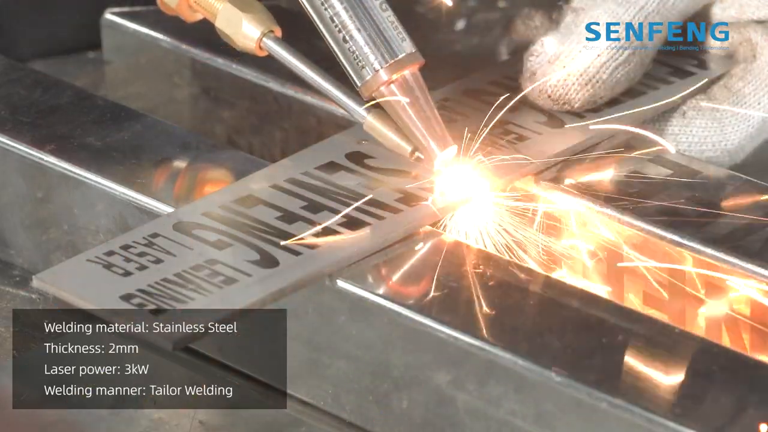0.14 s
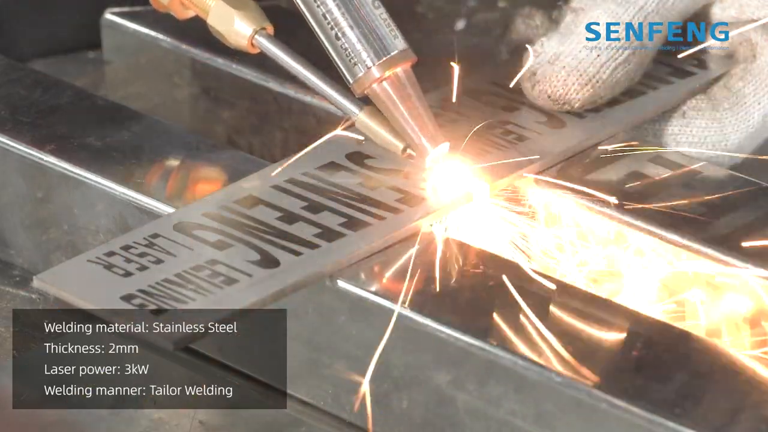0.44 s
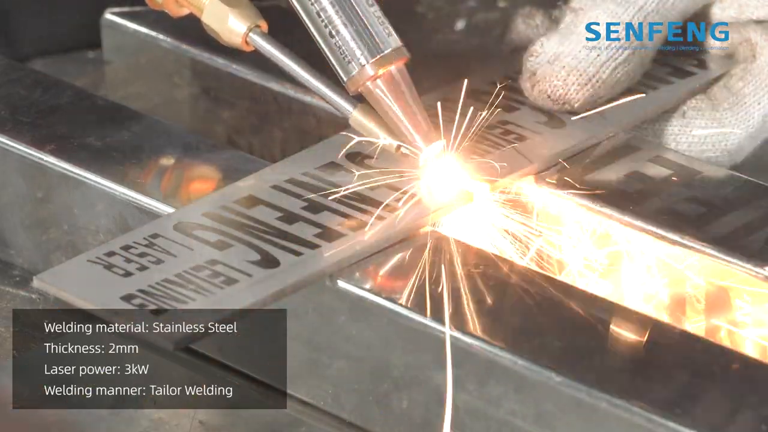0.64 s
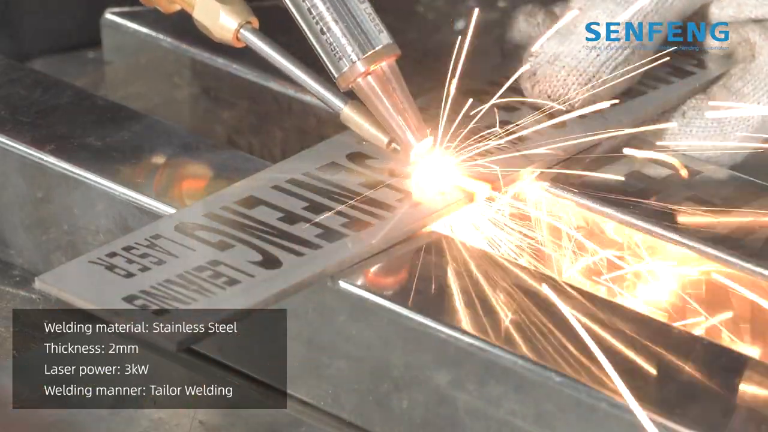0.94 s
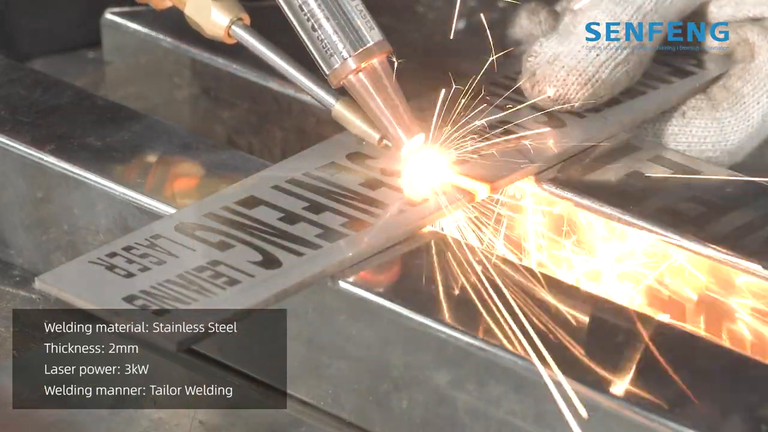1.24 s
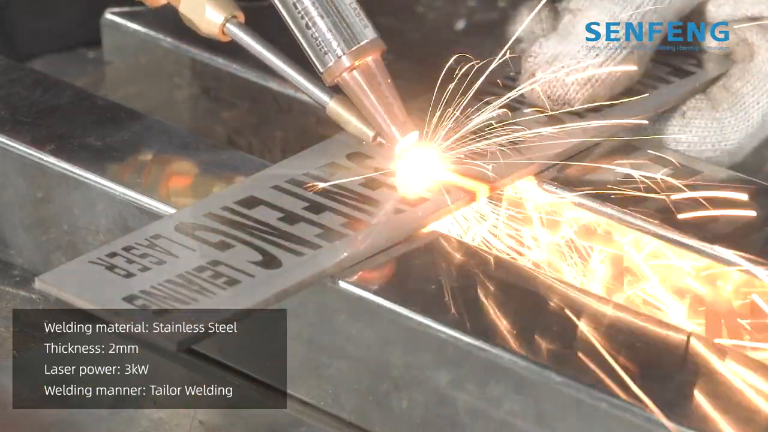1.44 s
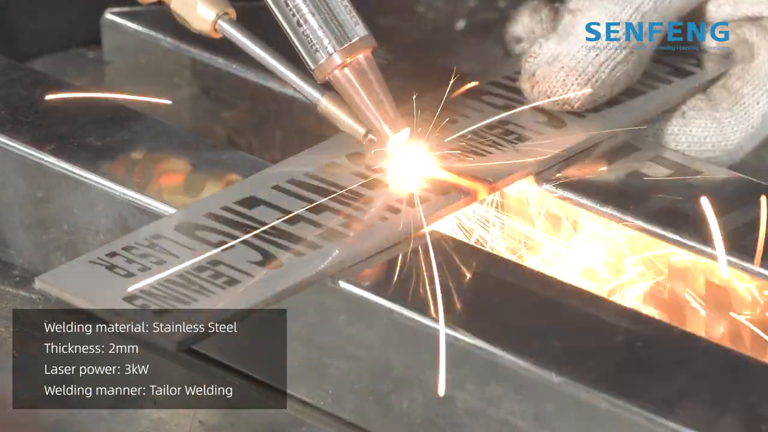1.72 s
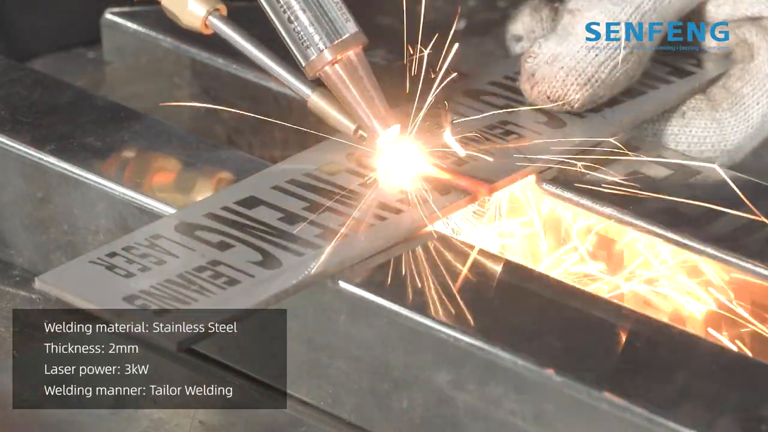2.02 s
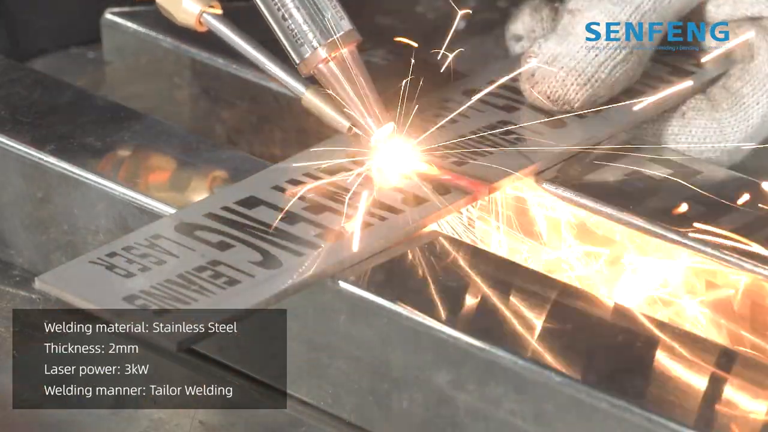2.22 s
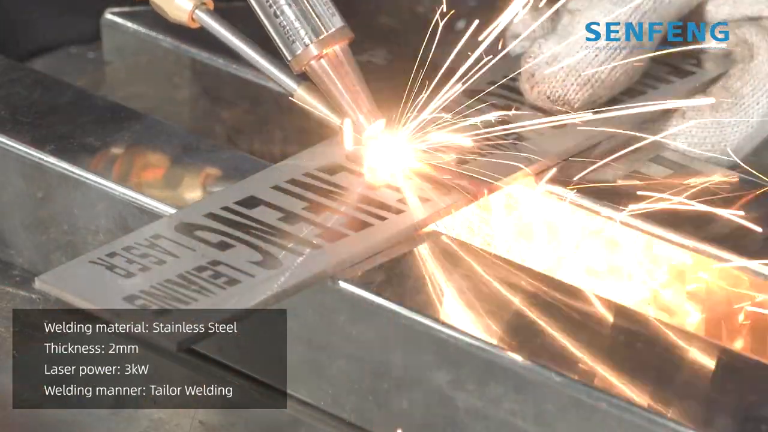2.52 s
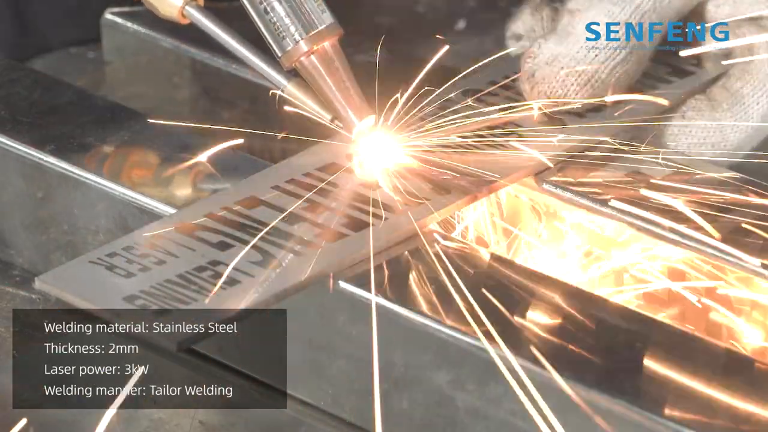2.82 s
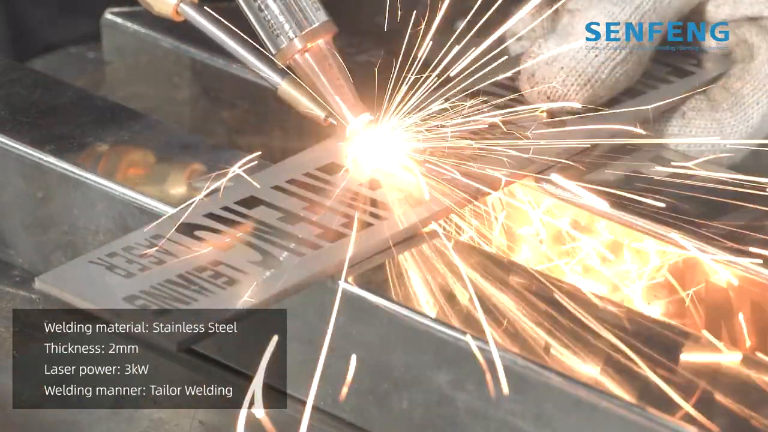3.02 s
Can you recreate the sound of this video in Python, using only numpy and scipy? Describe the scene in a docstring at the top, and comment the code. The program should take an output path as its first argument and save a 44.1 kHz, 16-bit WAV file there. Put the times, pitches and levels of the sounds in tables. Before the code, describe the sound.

Laser welding torch hisses steadily and harshly, with a fast buzzing sputter and soft gas puffs.

```python
"""Hand-held laser welding of a steel seam

A torch runs close to a stereo microphone in a workshop; its shielding gas is hissing filtered noise.
The hiss lulls with each sweep of the beam, and the melt spits noise bursts at both turns of the sweep.
A delayed copy off the metal and narrow wandering notches hollow the hiss; random echoes surround it.
The gas stream adds low noise in surges and soft puffs, and a faint whistle made by a wavering sine.
"""
import sys
import numpy as np
from scipy import signal
from scipy.fft import rfft, irfft
from scipy.io import wavfile
from scipy.ndimage import map_coordinates

SR = 44100
rng = np.random.default_rng(int(sys.argv[2]) if len(sys.argv) > 2 else 0)


def master(y):
    """Save y as 16-bit WAV."""
    cut = np.clip(np.atleast_2d(y).T, -1, 1)
    pcm = np.round(cut * 32767)  # scale
    wavfile.write(sys.argv[1], SR, pcm.astype(np.int16))


N = 139356
T = np.arange(N) / SR
FREQS = np.maximum(np.arange(N // 2 + 1) * SR / N, 1)

# Low flutter of the gas stream: time_s, level_db
FLUTTER_LEVEL = [(0, -52.5), (.18, -50), (.4, -71), (.62, -62), (1.03, -42.5), (1.13, -54), (1.3, -44.5),
                 (1.5, -54.5), (1.82, -60.5), (2.0, -42), (2.11, -51), (2.37, -43.5), (2.5, -60.5),
                 (2.74, -59), (2.81, -45.5), (3.05, -42), (3.15, -43.5)]
# Spectrum of the flutter: frequency_hz, gain_db
FLUTTER_SPECTRUM = [(30, -26), (60, -24), (110, -13), (180, -4), (330, -1.5), (550, 0.5), (900, -12),
                    (1600, -30), (4000, -57)]
# Phase lead of the left flutter over the right: frequency_hz, lead_rad
FLUTTER_PHASE = [(60, 0.29), (150, 0.56), (350, 1.3), (700, 1.6), (1500, 0.87)]
# Soft puffs of the gas stream: peak_s, half_length_s, level_db, centre_hz
PUFFS = [(0.165, 0.0079, -48, 192), (.796, .005, -41.5, 500), (0.889, .007, -39.5, 370),
         (0.958, .005, -40, 480), (1.03, .008, -39, 300), (1.066, 0.0055, -37.5, 400),
         (1.112, 0.0099, -45, 330), (1.189, .008, -42, 370), (1.244, 0.0092, -32, 434),
         (1.271, 0.0056, -37, 480), (1.315, 0.0097, -40.5, 500), (1.364, 0.0028, -36, 500),
         (1.917, 0.01, -42.5, 410), (1.972, 0.0066, -36.5, 560), (2.035, 0.0075, -35, 523),
         (2.055, .004, -42, 350), (2.227, 0.0073, -35, 436), (2.312, .005, -41, 450),
         (2.79, 0.0062, -39, 334), (2.808, 0.0089, -38, 440), (2.847, 0.0061, -37, 420),
         (2.902, .007, -39.5, 570), (2.931, .005, -37, 367), (2.995, 0.014, -35.5, 480),
         (3.052, 0.0074, -42, 276), (3.059, 0.011, -40, 950), (3.069, 0.0062, -35.5, 480),
         (3.107, 0.0057, -39, 400)]
# Faint whistle: time_s, level_db
WHISTLE_LEVEL = [(0, -55), (.9, -53), (1.1, -48), (1.33, -42), (1.5, -46.5), (1.62, -43), (1.76, -50),
                 (1.88, -70), (3.15, -76)]
# Resonances of the jet that grow or fade as the torch moves on: centre_hz, width_hz, change_db_per_s
JET_RESONANCES = [(1700, 270, -1), (5000, 170, -1.1), (6400, 140, -0.5), (6600, 200, 1.5),
                  (7800, 280, -0.7), (8500, 310, 1.5), (9300, 350, 0.2), (11600, 320, 1.3),
                  (15300, 400, -0.8)]
# Gain of the top treble: time_s, gain_db
TREBLE_GAIN = [(0, -0.2), (.6, -1.8), (1.1, -1.2), (1.3, 2), (1.8, 1.5), (2.15, -0.1), (2.5, -1.7),
               (2.8, -5), (3.15, -2)]
# Narrow notches in the hiss that come and go: centre_hz, width_hz, mean_depth (0-1)
NOTCHES = [(3020, 55, .45), (3735, 100, .85), (4540, 60, .5), (7140, 60, .4), (7980, 55, .35),
           (8850, 60, .25), (11290, 80, .3)]
# Spectrum of the hiss scattered round the bench: frequency_hz, gain_db
SCATTER_SPECTRUM = [(70, -64), (150, -46), (280, -29), (500, -25), (1000, -18), (1600, -15.5), (2200, -17),
                    (4300, -16.5), (7000, -15), (9500, -13.5), (12000, -16), (15500, -16)]
# Lag of the reflection off the metal as the torch moves: time_s, left_ms, right_ms
REFLECTION_LAG = [(0, 1.194, 1.203), (1.5, 1.191, 1.203), (2.6, 1.184, 1.2), (3.15, 1.175, 1.193)]
# Spectrum of the direct and reflected hiss: frequency_hz, left_db, right_db
HISS_SPECTRUM = [(100, -50, -50), (190, -30, -29), (290, -18.5, -17.5), (650, -16, -15.5),
                 (950, -16, -15.5), (1250, -11.5, -11), (1650, -20, -17), (2100, -21, -16.5),
                 (2700, -13.5, -12), (3400, -14.5, -15), (3740, -7, -7), (4100, -13.5, -14.5),
                 (4600, -10.5, -10), (5050, -10.8, -9.8), (5500, -10, -11), (5850, -15, -14),
                 (6060, -14, -12), (6280, -3, -3), (6600, -12.5, -12), (6950, -10, -7), (7200, -11, -8),
                 (7700, -11, -5.5), (8000, -12, -11), (8400, -7.5, -8), (9100, -13, -5.5),
                 (10000, -8, -6.5), (10900, -7, -8), (11350, -18, -16), (11750, -10, -8), (12150, -13, -12),
                 (12650, -5.5, -8), (13150, -16, -6), (13650, 0.5, -11), (14050, -13, -8),
                 (14400, -6.5, -16), (14850, -19, -20), (15300, -3, -9), (15700, -18, -8)]
# Phase lead of the left hiss over the right: frequency_hz, lead_rad
HISS_PHASE = [(100, 0.37), (500, 0.079), (1500, 1.01), (6000, 0), (8000, 0.68), (10000, 0.83),
              (11200, 0.44), (13000, 1.67), (15000, 0.57)]
# Spectrum of the gas jet at the nozzle: frequency_hz, gain_db
GAS_SPECTRUM = [(150, 3.5), (600, 2), (1800, 3.5), (3500, -4), (6000, 2.14), (8500, -1.74), (11000, 2),
                (13500, 3), (15500, 3)]
# Lulls of the gas within one sweep: position_cycles, width_cycles, depth (0-1)
SWEEP_LULLS = [(.84, .11, .36), (.36, .08, .09)]
# Turns of the beam within one sweep: position_cycles, width_cycles, relative_level_db
BEAM_TURNS = [(0.078, 0.12, -9.5), (.57, 0.11, -9.5)]
# Strength of the spitting melt against the gas: time_s, level_db
SPIT_LEVEL = [(0, -32), (.7, -7), (1.15, -9), (1.28, -3), (1.55, -7), (1.75, -4), (2.05, -8), (2.42, -1.5),
              (2.88, -4.5), (3.07, -2.5)]
# Spectrum of the spitting: frequency_hz, gain_db
SPIT_SPECTRUM = [(200, -9), (1500, -1.5), (3500, 3.5), (6500, 3), (8700, 4), (11000, -4), (14000, 0.5),
                 (16000, 4)]

WALLS_DB, WALLS_T60_S = -16, 0.25
FLUTTER_ROUGH_DB, FLUTTER_ROUGH_HZ = 1.5, 79
FLUTTER_SURGE_DB, FLUTTER_SURGE_HZ = 1.8, 22
FLUTTER_PAN_DB = -1.4  # left against right
FLUTTER_APART = 0.39  # gain of the independent flutter at each microphone
PUFF_BELOW_OCTAVES, PUFF_ABOVE_OCTAVES = 0.81, 0.7  # spread below and above the centre
WHISTLE_HZ, WHISTLE_WAVER_HZ, WHISTLE_WAVER_RATE_HZ = 1641, 2, 19
WHISTLE_FLICKER_DB, WHISTLE_FLICKER_HZ, WHISTLE_LATE_MS = 1.2, 11, 0.18
TREBLE_FROM_HZ = 14200
NOTCH_SWING, NOTCH_RATE_HZ, NOTCH_WANDER_HZ = 0.33, 9, 28
HISS_DB, SCATTER_T60_S = -25.5, 0.16
REFLECTION_GAIN, REFLECTION_FROM_HZ, REFLECTION_TO_HZ = 0.8, 2000, 12300
TREMOR_MS, TREMOR_HZ = 0.003, 4
SWEEP_HZ = 68.03
GAS_FADE_DB_PER_S = 0.05
SPIT_SCATTER_DB = 2.5
FLICKER_DB, FLICKER_HZ = 0.28, 77
BASS_HZ, TOP_HZ = 60, 15720


def undb(db):
    """Amplitude ratio: twenty decibels are a factor of ten."""
    return 10 ** (np.asarray(db) / 20)


def unit(x):
    """Normalization: scale to a root mean square of 1."""
    return x / np.sqrt(np.mean(x ** 2))


def curve(table, axis=1):
    """Linear interpolation: one column of a table joined by straight lines in time."""
    rows = np.array(table)
    return np.interp(T, rows[:, 0], rows[:, axis])


def over_frequency(table, axis=1):
    """Linear interpolation of one column over the logarithm of frequency."""
    rows = np.array(table)
    return np.interp(np.log(FREQS), np.log(rows[:, 0]), rows[:, axis])


def shape(x, gain):
    """Linear filtering: multiply the spectrum by a gain for each frequency."""
    return irfft(rfft(x) * gain, N)


def colour(x, table, axis=1):
    """Spectral shaping by a table of frequencies and decibels."""
    return shape(x, undb(over_frequency(table, axis)))


def band(x, hz, width):
    """Band-pass filtering with a flat top and smooth edges."""
    return shape(x, np.exp(-0.5 * ((FREQS - hz) / width) ** 4))


def lagged(x, table):
    """Phase lag: hold back each frequency by a table of radians."""
    return shape(x, np.exp(-1j * over_frequency(table)))


def late(x, ms):
    """Propagation delay, fixed or moving, by interpolation between samples."""
    return map_coordinates(x, [(T - ms * 10 ** -3) * SR], order=5, mode="mirror")


def noise():
    """White noise: equal mean power at every frequency."""
    return rng.standard_normal(N)


def walk(hz):
    """Random modulation: noise low-passed near the given rate, with an rms of 1."""
    return unit(shape(noise(), np.exp(-(FREQS / hz) ** 2)))


def in_sweep(at, width):
    """Periodic modulation: a bell that comes round once in every sweep of the beam."""
    cycles_away = (T * SWEEP_HZ - at + 0.5) % 1 - 0.5
    return np.exp(-0.5 * (cycles_away / width) ** 2)


def walls(pair):
    """Reverberation: convolution with decaying noise, different at each microphone."""
    tails = np.array([noise(), noise()]) * np.exp(-np.log(1000) * T / WALLS_T60_S)
    tails = tails / np.sqrt(np.sum(tails ** 2, axis=1, keepdims=True))
    return undb(WALLS_DB) * shape(pair, rfft(tails))


def puffs():
    """Short turbulence bursts: bands of noise under bell-shaped envelopes."""
    total = np.zeros(N)
    for at, length, db, hz in PUFFS:
        bell = np.exp(-0.5 * ((T - at) / length) ** 2)
        spread = np.where(FREQS < hz, PUFF_BELOW_OCTAVES, PUFF_ABOVE_OCTAVES)
        puff = bell * shape(noise(), np.exp(-0.5 * (np.log2(FREQS / hz) / spread) ** 2))
        total += undb(db) * puff * np.std(bell) / np.std(puff)
    return total


def flutter():
    """Turbulent buffeting: surging low noise and puffs, partly shared, with the left leading in phase."""
    roughness_db = FLUTTER_ROUGH_DB * walk(FLUTTER_ROUGH_HZ)
    surge_db = FLUTTER_SURGE_DB * walk(FLUTTER_SURGE_HZ)
    force = unit(undb(roughness_db + surge_db)) * undb(curve(FLUTTER_LEVEL))
    shared, left, right = (unit(colour(noise(), FLUTTER_SPECTRUM)) * force for _ in range(3))
    shared = shared + puffs()
    pair = np.array([shared, lagged(shared, FLUTTER_PHASE)]) + FLUTTER_APART * np.array([left, right])
    return pair * undb([[FLUTTER_PAN_DB / 2], [-FLUTTER_PAN_DB / 2]])


def whistle():
    """Tone blown by the gas: a sine with random frequency and amplitude modulation, later on the right."""
    hz = WHISTLE_HZ + WHISTLE_WAVER_HZ * walk(WHISTLE_WAVER_RATE_HZ)
    sine = np.sin(2 * np.pi * np.cumsum(hz) / SR)
    flicker = undb(WHISTLE_FLICKER_DB * walk(WHISTLE_FLICKER_HZ))
    tone = unit(sine * flicker) * undb(curve(WHISTLE_LEVEL))
    return np.array([tone, late(tone, WHISTLE_LATE_MS)]) * undb([[-2], [1]])


def drifting(pair):
    """Time-varying resonance: bands grow or fade along the seam, and the top treble swells and sinks."""
    for hz, width, db_per_s in JET_RESONANCES:
        change = undb(db_per_s * (T - T.mean())) - 1
        pair = pair + change * band(pair, hz, width)
    treble = shape(pair, FREQS > TREBLE_FROM_HZ)
    return pair + (undb(curve(TREBLE_GAIN)) - 1) * treble


def hollowed(pair):
    """Moving notch filtering: narrow cuts wander in pitch together and vary in depth, so the hiss is phasey."""
    wander_hz = NOTCH_WANDER_HZ * walk(NOTCH_RATE_HZ)
    wander = np.exp(2j * np.pi * np.cumsum(wander_hz) / SR)
    # shift the spectrum, take fixed bands, then shift them back
    shifted = np.real(signal.hilbert(pair) / wander)
    cut = 0
    for hz, width, mean_depth in NOTCHES:
        depth = np.clip(mean_depth + NOTCH_SWING * walk(NOTCH_RATE_HZ), 0, 1)
        cut = cut + depth * band(shifted, hz, width)
    return pair - np.real(signal.hilbert(cut) * wander)


def scattered(source):
    """Diffuse scattering round the bench: independent noises follow the source's decaying energy."""
    tail = np.exp(-2 * np.log(1000) * T / SCATTER_T60_S)
    lingering = np.sqrt(np.abs(shape(source ** 2, rfft(tail / tail.sum()))))
    return np.array([colour(noise() * lingering, SCATTER_SPECTRUM) for _ in range(2)])


def hiss():
    """Interference: direct sound meets its reflection off the metal, whose lag trembles with the hand."""
    source = torch()
    low_cut = 1 / (1 + (REFLECTION_FROM_HZ / FREQS) ** 2)
    high_cut = 1 / (1 + (FREQS / REFLECTION_TO_HZ) ** 20)
    mirrored = REFLECTION_GAIN * shape(source, low_cut * high_cut)
    tremor = TREMOR_MS * walk(TREMOR_HZ)
    sides = []
    for side in (1, 2):
        reflected = late(mirrored, curve(REFLECTION_LAG, side) + tremor)
        sides.append(colour(source + reflected, HISS_SPECTRUM, side))
    left, right = sides
    near = np.array([left, lagged(right, HISS_PHASE)])
    return unit(drifting(near + scattered(source))) * undb(HISS_DB)


def gas():
    """Jet noise: shaped noise with amplitude lulls in each sweep and a slight steady fade."""
    lull = sum(depth * in_sweep(at, width) for at, width, depth in SWEEP_LULLS)
    jet = colour(noise(), GAS_SPECTRUM) * (1 - lull)
    return unit(jet) * undb(-GAS_FADE_DB_PER_S * T)


def melt():
    """Impulsive noise: a spit of random size at each turn of the beam."""
    spits = 0
    for at, width, db in BEAM_TURNS:
        sweep = np.floor(T * SWEEP_HZ - at + 0.5).astype(int) + 1
        scatter = np.clip(rng.standard_normal(size=400), -2, 2)
        size = undb(db + SPIT_SCATTER_DB * scatter)
        spits = spits + size[sweep] * in_sweep(at, width)
    return unit(colour(noise() * spits, SPIT_SPECTRUM)) * undb(curve(SPIT_LEVEL))


def torch():
    """Superposition of gas and melt under a shared random flicker of level."""
    return (gas() + melt()) * undb(FLICKER_DB * walk(FLICKER_HZ))


def scene():
    """Superposition of hiss with its wall echo, flutter and whistle."""
    jet = hiss()
    return hollowed(jet + walls(jet)) + flutter() + whistle()


def record(dry):
    """Band limiting: a gentle high-pass thins the deep bass and a steep low-pass cuts the top."""
    high_pass = signal.butter(2, BASS_HZ, "high", fs=SR, output="sos")
    low_pass = signal.ellip(12, 0.1, 80, TOP_HZ, fs=SR, output="sos")
    return signal.sosfilt(low_pass, signal.sosfilt(high_pass, dry))


dry = scene()
out = record(dry)
master(out)
```